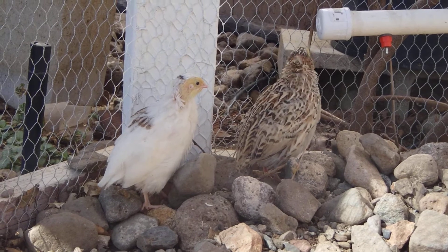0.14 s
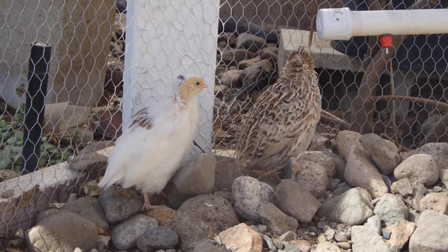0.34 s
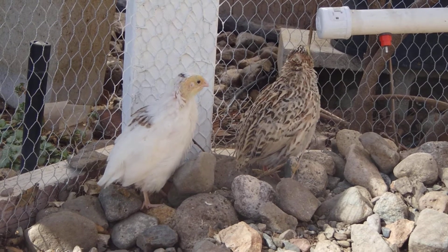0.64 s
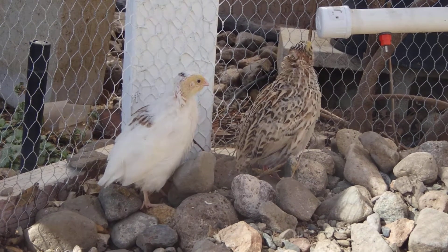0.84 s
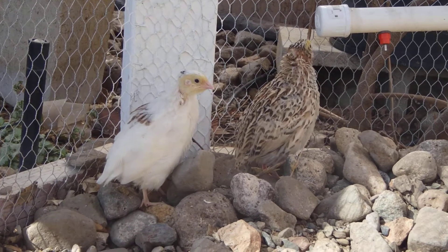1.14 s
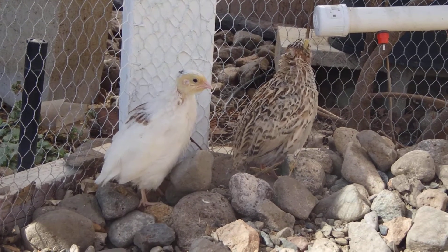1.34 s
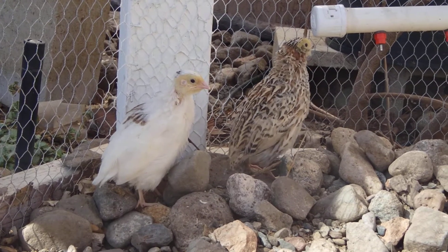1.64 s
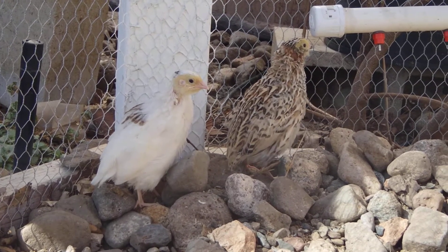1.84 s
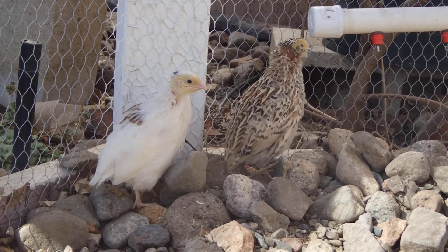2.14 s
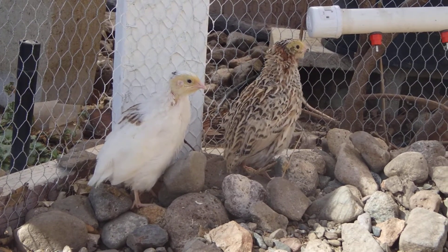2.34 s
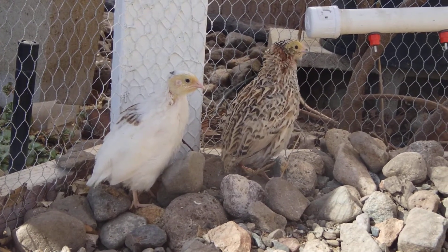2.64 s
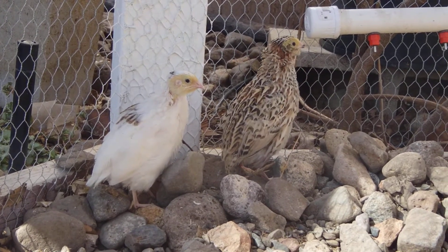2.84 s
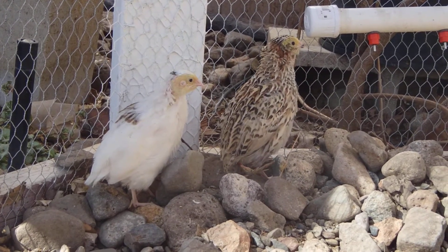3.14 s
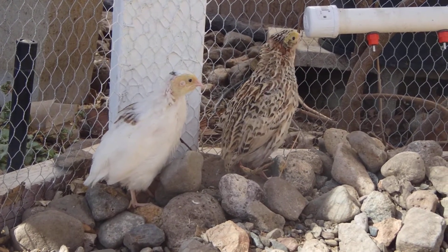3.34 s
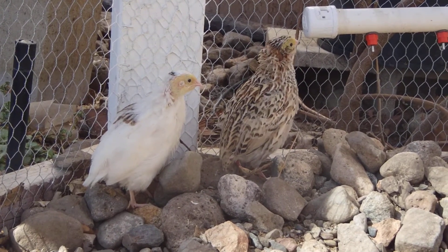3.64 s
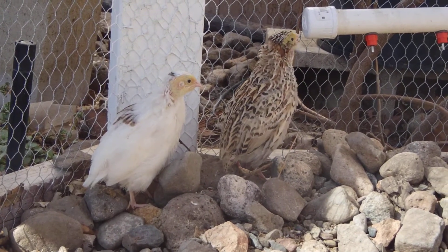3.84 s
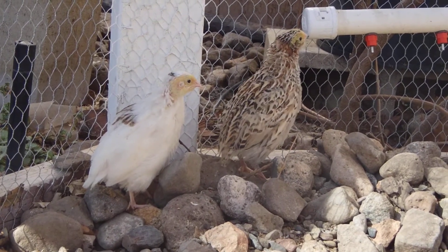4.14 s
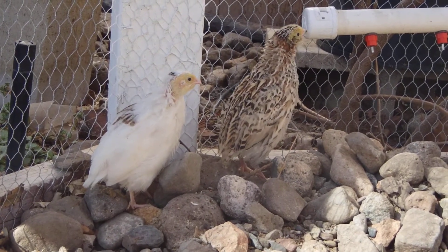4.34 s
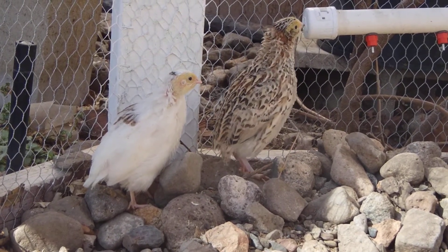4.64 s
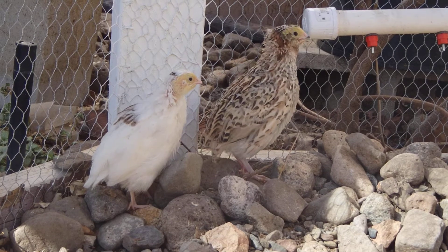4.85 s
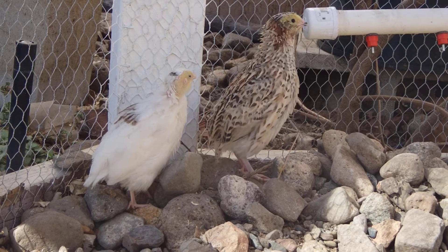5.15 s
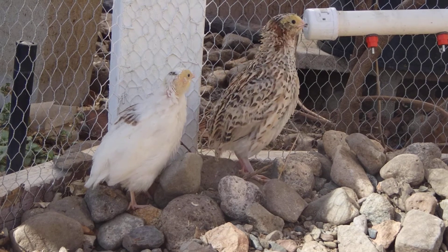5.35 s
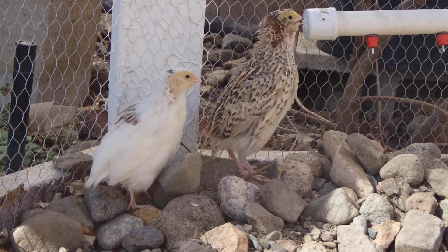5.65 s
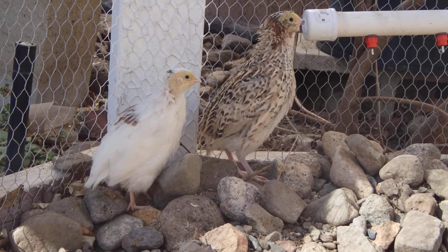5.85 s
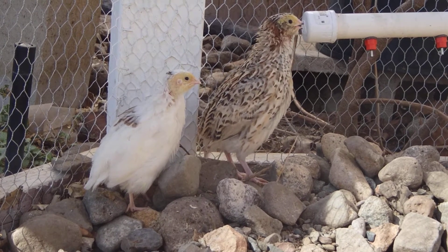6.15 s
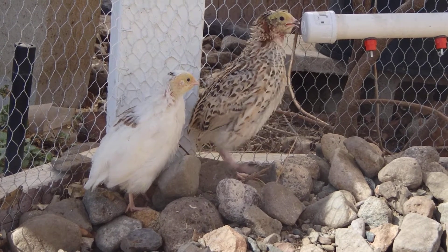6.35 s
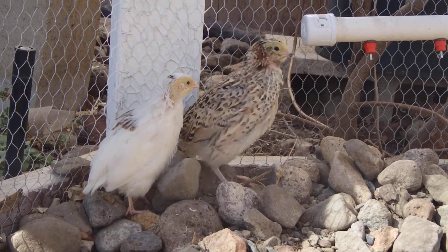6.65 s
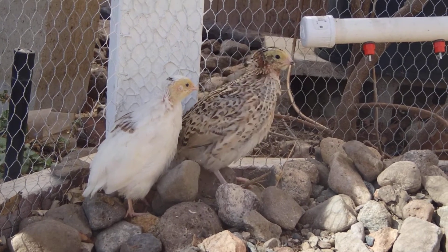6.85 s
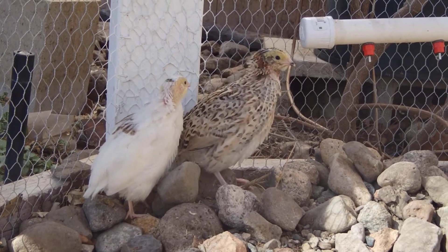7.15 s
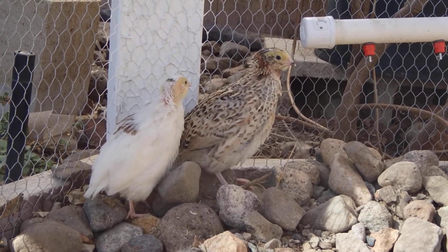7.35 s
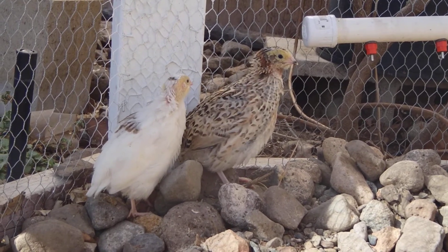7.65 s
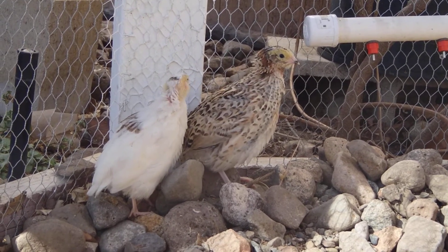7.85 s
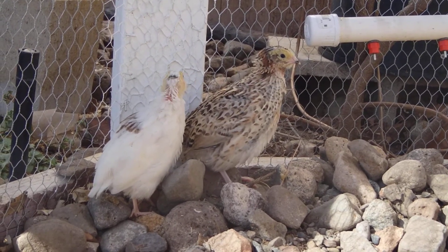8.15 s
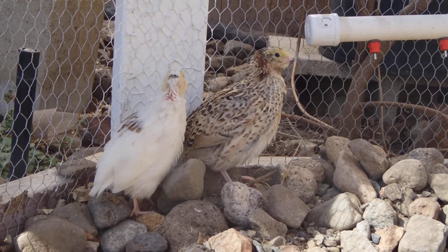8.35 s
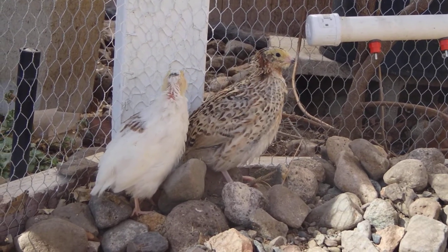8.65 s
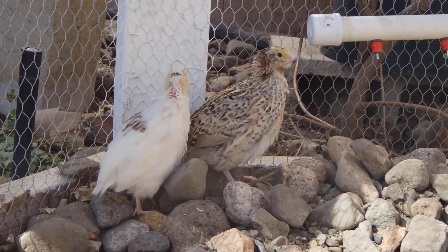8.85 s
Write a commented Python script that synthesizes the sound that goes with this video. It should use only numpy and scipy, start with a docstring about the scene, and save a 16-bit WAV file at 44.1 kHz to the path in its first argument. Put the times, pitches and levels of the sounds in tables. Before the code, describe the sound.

A faint outdoor rumble and hiss carry scattered chirps from birds across a yard. Nearby, a penned quail whimpers once, with a little scuffing and cracking of grit, then mutters hoarsely four times. It works up to six evenly spaced, sharp crows, each a wavering whistle that drops at the end, the strongest distorting a little. Distant chirps and two dull bumps remain afterward.

```python
"""A quail in a wire pen, close to the microphone, gives a faint whimper, four hoarse mutters, then six
crows that grow into loud, quavering, falling whistles. Its syrinx sounds a gliding tone and its throat
lifts the octave. Posts and walls throw the calls back, and the loudest overload the microphone.
Grit cracks underfoot among a few scuffs and soft bumps; birds chirp far off across the yard,
over a low outdoor rumble and hiss."""
import sys
import numpy as np
from scipy import signal
from scipy.fft import rfft, irfft
from scipy.io import wavfile
from scipy.ndimage import uniform_filter1d

SR = 44100
rng = np.random.default_rng(int(sys.argv[2]) if len(sys.argv) > 2 else 0)


def store_wav(level_fs):
    """Save 16-bit WAV to argv[1]."""
    pcm = np.round(np.clip(np.atleast_2d(level_fs), -1, 1) * 32767)
    wavfile.write(sys.argv[1], SR, pcm.T.astype(np.int16))


N = 396459

BREAK_S, CATCH_WIDTH_S = .002, .006  # how fast the voice changes register, and how briefly it catches

# Soft mutters, close by. Each row: start and length in seconds, settled pitch in Hz, slide time and hitch
# time in seconds, hitch lift in Hz; levels in dB, before the throat, of the fundamental and of the octave
# in the yelp, once settled and in the ending; hoarseness (0 is clear) once settled and in the ending.
QUAIL_MUTTERS = [(0.898, .21, 1375, 0.0095, 0.092, 40, -49.5, -43.5, -46, -46, 0.75, 1.04),
                 (1.509, .18, 1243, .018, .051, 100, -47.5, -40.5, -51, -44.5, 0.4, 0.97),
                 (2.266, 0.18, 1231, .019, 0.047, 149, -46, -38.5, -48.5, -42, 0.34, 0.94),
                 (2.825, 0.2, 1187, .018, 0.032, 269, -44, -37, -35, -38, .12, 0.27)]
# Full crows from the same spot. Each row: start and length in seconds, pitch at the catch in Hz, sag in
# Hz per second, crest length in seconds, crest lift in Hz; loudest from, loudest until and catch time in
# seconds; catch depth in dB; levels in dB, before the throat, of the fundamental, the side tone and the
# octave at the opening, at its loudest, before the catch and in the tail; beak gain on overtones in dB.
QUAIL_CROWS = [(3.354, 0.21, 1242, 60, 0.014, 38, .095, 0.12, 0.15, 17, -33.5, -33.5, -34, -15.5, -26, -21.5, -9),
               (3.915, 0.22, 1271, 200.4, 0.024, 216, 0.076, 0.091, 0.15, 12, -29, -31.5, -25, -12, -25.5, -15, -9),
               (4.465, 0.23, 1261, 261, 0.036, 300, 0.071, 0.081, .166, 18.5, -25.5, -24, -19, -2.5, -18.5, -12.5, -5),
               (5.036, 0.23, 1252, 620, 0.036, 320, 0.062, 0.12, 0.17, 0, -25, -26.5, -12, -3.5, -12, -12, 0),
               (5.655, 0.22, 1249, 476, .02, 130, 0.095, 0.11, .166, 17, -23.5, -31.5, -10.5, -3.5, -14, -8, 1),
               (6.333, 0.23, 1239, 331, .015, 20, 0.051, 0.073, 0.16, 6.5, -26, -31.5, -13, -8.5, -17.5, -12.5, 1.5)]

def quail(whimper_at_s=.35):
    """The bird in the pen works up from a whimper through mutters to full crows."""
    out = np.zeros(N)
    add(out, whimper_at_s, whimper())
    for start, *row in QUAIL_MUTTERS:
        add(out, start, mutter(*row))
    for start, *row in QUAIL_CROWS:
        add(out, start, crow(*row))
    return out


def crow(length, pitch_hz, sag, crest_s, crest_hz, loudest_s, until_s, catch_s, catch_db,
         low_db, side_db, open_db, top_db, late_db, tail_db, beak_db,
         pip_hz=2005, pip_s=.0135, quaver_at_s=.0195, quaver_s=.037, quaver_hz=245,
         sag_from_s=.085, fall_hz_per_s=2400, weak_db=-28.5, side_hz=1693):
    """A pip breaks into a quaver that swells to a crest; the whistle holds, catches and falls away."""
    t = np.arange(0, length, 1 / SR)
    pip = 1 - step(t, pip_s, BREAK_S)
    quaver = np.sin(2 * np.pi * np.clip((t - quaver_at_s) / quaver_s, 0, 1)) ** 2  # two upward swings
    crest_at = quaver_at_s + quaver_s
    lift_hz = crest_hz * np.sin(np.pi * np.clip((t - crest_at) / crest_s, 0, 1) ** .75)
    crest = lift_hz / quaver_hz
    opening = 1 - step(t, crest_at + .68 * crest_s, CATCH_WIDTH_S)
    catch, tail = hump(t, catch_s, CATCH_WIDTH_S), step(t, catch_s, CATCH_WIDTH_S)

    hz = pitch_hz + sag * (catch_s - np.clip(t, sag_from_s, catch_s))
    hz -= fall_hz_per_s * np.maximum(t - catch_s - .006, 0)
    hz += quaver_hz * quaver + lift_hz + 40 * catch
    hz += pip * (pip_hz - hz)

    swell_db = np.interp(t, [pip_s, loudest_s, until_s, catch_s], [open_db, top_db, top_db, late_db])
    swell_db += tail * (tail_db - swell_db) - catch_db * catch
    octave_db = swell_db + pip * (-42 - swell_db)  # the pip has little octave
    fundamental_db = low_db + .22 * (swell_db - top_db) * (1 - pip)  # follows part of the swell
    fundamental_db += 2 * crest - 1.5 * pip - 4 * tail
    overtones_db = beak_db - 12 * opening - 9 * catch  # duller in the quaver and the catch
    waver_db = 1.25 * flutter(len(t), width_hz=25).real
    fade_db = 18.5 * edges(t, attack_s=.0069, release_s=.014) + waver_db

    weak = step(-swell_db, -weak_db, 4) * (t < loudest_s)  # hoarse until the octave gains strength
    rough = .02 + .068 * opening + .3 * weak
    # a rough side tone sounds at the top of each swing
    side_tone = (np.exp(2j * np.pi * side_hz * t) * flutter(len(t), width_hz=49)).real
    side_tone *= gain_of(side_db) * (quaver + crest)
    return side_tone + voice(hz, fundamental_db - fade_db, octave_db - fade_db, rough, overtones_db)


def mutter(length, pitch_hz, slide_s, hitch_s, hitch_hz, low_db, yelp_db, settled_db, ending_db,
           settled_rough, ending_rough, squeak_hz=2160, catch_s=.138, throb_hz=34.6,
           droop_hz_per_s=900, yelp_rough=.34):
    """A squeak slides down in a throbbing yelp, settles, catches and ends hoarsely."""
    t = np.arange(0, length, 1 / SR)
    yelp = np.exp(-np.maximum(t - .023, 0) / .04)
    ending = step(t, catch_s, CATCH_WIDTH_S)
    hz = pitch_hz + (squeak_hz - pitch_hz) * np.exp(-t / slide_s) + hitch_hz * hump(t, hitch_s, .008)
    hz += ending * (90 * ending_rough - droop_hz_per_s * (t - catch_s))  # a hoarse ending starts higher

    throb_db = 6 * np.cos(2 * np.pi * throb_hz * (t - .022)) * np.exp(-t / .13) * (1 - ending)
    octave_db = settled_db + throb_db + yelp * (yelp_db - settled_db) + ending * (ending_db - settled_db)
    octave_db -= 11 * (1 - step(t, .01, BREAK_S))  # held back until the squeak breaks
    squeak = hump(t, at=.01, width=.0054)
    fundamental_db = low_db + 10 * squeak - 2 * ending
    fade_db = 11 * edges(t, attack_s=.009, release_s=.026) + 10 * hump(t, catch_s, CATCH_WIDTH_S)
    rough = settled_rough + yelp * (yelp_rough - settled_rough) + ending * (ending_rough - settled_rough)
    return voice(hz, fundamental_db - fade_db, octave_db - fade_db, rough, beak_db=-11, rasp_hz=330)


def whimper(length_s=.13, from_hz=1460, to_hz=1340):
    """One weak falling note, faint even this close."""
    t = np.arange(0, length_s, 1 / SR)
    hz = np.linspace(from_hz, to_hz, len(t))
    fade_db = 6 * edges(t, attack_s=.018, release_s=.072)
    return voice(hz, low_db=-48.5 - fade_db, octave_db=-63 - fade_db, rough=.24, beak_db=-8)


# The throat's colour on fundamental and octave; the octave crosses its upper edge as a crow crests.
# Each row: frequency in Hz, gain in dB.
THROAT_COLOUR = [(1080, -7.5), (1180, -1), (1720, -1), (1980, -2), (2230, -1.5), (3050, 1.5), (3180, -8),
                 (3320, -22), (3600, -13), (4200, -12)]
# Partials 3 to 6. Each row: frequency in Hz, level against the fundamental in dB.
OVERTONE_COLOUR = [(3350, -12), (3800, -16), (4200, -14.5), (4450, -15.5), (4650, -13), (5100, -21.5),
                   (5450, -28.5), (6300, -44), (8000, -46)]

def voice(hz, low_db, octave_db, rough, beak_db, rasp_hz=260, easy_hz=1310, strain_db_per_hz=.2):
    """The syrinx sounds a gliding tone; the throat colours its fundamental and its strong octave."""
    size = len(hz)
    # a hoarse voice holds its pitch and strength less steadily
    hz = hz * (1 + (.0064 + .04 * rough) * flutter(size, width_hz=70).real)
    strength = gain_of(6 * np.minimum(rough, .5) * flutter(size, width_hz=45).real)
    phase = 2 * np.pi * np.cumsum(hz) / SR
    partials = [(1, low_db + read(THROAT_COLOUR, hz), rough),
                (2, octave_db + read(THROAT_COLOUR, 2 * hz), rough)]
    # the overtones thin out when the pitch is strained upward
    upper_db = low_db + beak_db - strain_db_per_hz * np.clip(hz - easy_hz, 0, 400)
    partials += [(k, upper_db + read(OVERTONE_COLOUR, k * hz), rough + .23) for k in range(3, 7)]
    tone = 0
    for k, db, hoarseness in partials:
        smear = np.clip(.94 * hoarseness, 0, 1)  # turbulence smears the partial into a band
        rasp = np.sqrt(1 - smear ** 2) + smear * flutter(size, rasp_hz)
        tone += gain_of(db) * np.exp(1j * k * phase) * rasp
    return np.sqrt(2) * strength * tone.real * signal.windows.tukey(size, .04)


# Stones, post and walls around the pen. Each row: delay in seconds, level in dB, side (-1 left, 1 right).
PEN_REFLECTIONS = [(.0031, -13.5, 0.55), (.0082, -15, -0.32), (0.0145, -10.5, 0.53), (0.0227, -25, -0.8),
                   (0.038, -24, 0)]

def pen(calls, direct_s=.0014, bird_side=-.17, port_lag_s=.000092):
    """Direct sound and reflections reach the microphone's two ports, each with its own colour."""
    hz = np.fft.rfftfreq(N, 1 / SR)
    ports = np.array([[.5], [-.5]])
    paths = sum(gain_of(db) * np.exp(-2j * np.pi * hz * (delay + ports * side * port_lag_s))
                for delay, db, side in [(direct_s, 0, bird_side)] + PEN_REFLECTIONS)
    balance_db = read([(700, -.5), (1300, 1), (2400, 1.3), (3000, -3.5), (4400, 11.5), (8000, 0)], hz)
    return irfft(rfft(calls) * paths * gain_of(ports * balance_db), N)


# Grit cracking under a foot. Each row: start in seconds, level in dB.
GRIT_CRACKS = [(0.6346, -28), (0.6436, -26), (0.653, -24), (0.6582, -20), (.675, -24), (0.847, -41)]
# Soft scuffs. Each row: start in seconds, length in seconds, level in dB.
FOOT_SCUFFS = [(0.623, 0.076, -41.5), (0.953, 0.15, -45.5), (6.124, 0.065, -39.5)]
# The colours of grit and of scuffing. Each row: frequency in Hz, relative level in dB.
GRIT_COLOUR = [(300, -14), (1000, -11.5), (2100, -5), (3000, 2), (4000, -4), (4800, 7), (5500, -2),
               (7000, 1.5), (8500, -20), (15000, -30)]
SCUFF_COLOUR = [(500, -25), (1400, -2.5), (2700, 2), (3600, -13), (4500, -5), (6000, -21), (14000, -27)]

def feet(crack_s=.0017, left_db=-3):
    """A little right of centre, grit snaps in tiny bursts; feet and feathers scuff."""
    cracks, scuffs = np.zeros((2, 2, N))
    t = np.arange(SR // 100) / SR
    for start, db in GRIT_CRACKS:
        burst = rng.standard_normal(len(t)) + .64 * rng.standard_normal((2, len(t)))
        add(cracks, start, gain_of(db) * burst * np.exp(-t / crack_s))
    for start, length, db in FOOT_SCUFFS:
        size = int(length * SR)
        rub = rng.standard_normal(size) + .5 * rng.standard_normal((2, size))
        add(scuffs, start, gain_of(db) * rub * np.hanning(size))
    return (coloured(cracks, GRIT_COLOUR) + coloured(scuffs, SCUFF_COLOUR)) * gain_of([[left_db], [0]])


# Soft bumps, dead centre. Each row: start in seconds, pitch in Hz, level in dB, decay in seconds.
SOFT_BUMPS = [(.672, 85, -31.5, 0.006), (0.7449, 128, -24.5, 0.0032), (.745, 290, -37, .004),
              (7.326, 97, -35, 0.012), (7.594, 78.6, -25.5, 0.0058)]

def bumps():
    """Dull knocks that swing for a cycle or two."""
    out, t = np.zeros(N), np.arange(SR // 5) / SR
    for start, hz, db, decay in SOFT_BUMPS:
        envelope = t / decay * np.exp(1 - t / decay)
        add(out, start, -gain_of(db) * np.sin(2 * np.pi * hz * t) * envelope)
    return out


# Birds far from the microphone. Each row: start and length in seconds, first and last pitch in Hz,
# level in dB before the mix, harshness as band width in Hz.
FAR_CHIRPS = [(0.059, 0.14, 2970, 3100, -53.5, 220), (.5, .3, 2070, 2130, -58, 50),
              (.555, 0.059, 2980, 3190, -47.5, 200), (1.095, 0.065, 3930, 4140, -55, 100),
              (1.814, 0.066, 2757, 3600, -41.5, 333), (1.951, 0.15, 3000, 2810, -53, 300),
              (2.545, 0.056, 2800, 2970, -50, 250), (4.259, 0.068, 2435, 3330, -38.5, 200),
              (4.977, .025, 3010, 3190, -46, 298), (5.516, 0.1, 2880, 3050, -46.5, 197),
              (6.80, 0.055, 2100, 2640, -53.5, 120), (6.923, 0.062, 2770, 3290, -39, 300),
              (6.985, 0.087, 3070, 3030, -44.5, 220), (7.11, 0.025, 3000, 3050, -47.5, 200),
              (7.187, 0.051, 3110, 3190, -48, 200), (7.60, 0.12, 2030, 2330, -54, 25),
              (7.621, 0.11, 2980, 3050, -54, 150), (7.632, 0.094, 4120, 4600, -57.5, 320),
              (7.892, 0.056, 3870, 4400, -56, 260), (7.915, 0.061, 2330, 3000, -45.5, 80),
              (8.50, 0.056, 2000, 2300, -59, 70), (8.804, 0.13, 2990, 3170, -51, 199)]

def far_birds():
    """Short slurs, some clear and some harsh."""
    out = np.zeros(N)
    for start, length, from_hz, to_hz, db, width_hz in FAR_CHIRPS:
        size = int(length * SR)
        phase = 2 * np.pi * np.cumsum(np.linspace(from_hz, to_hz, size)) / SR
        tone = (np.exp(1j * phase) * flutter(size, width_hz)).real
        add(out, start, gain_of(db) * np.sqrt(2) * tone * signal.windows.tukey(size, .6))
    return out


# The yard's reverberation. Each row: frequency in Hz, time to fall 60 dB in seconds.
YARD_DECAY = [(1000, 0.31), (2500, 0.42), (5000, 0.54), (12000, 0.19)]

def yard(sound, apart=.33, build_s=.023):
    """A diffuse tail, partly shared by the two ports, each band dying at its own speed."""
    taps = rng.standard_normal(SR) + apart * rng.standard_normal((2, SR))
    taps *= np.clip(np.arange(SR) / SR / build_s, 0, 1)
    hz, t, bands = signal.stft(taps, SR, nperseg=256)
    decay = gain_of(-60 * t / read(YARD_DECAY, hz)[:, None])
    tail = signal.istft(bands * decay, SR, nperseg=256)[1]
    return signal.fftconvolve(sound[None], tail / np.linalg.norm(tail[0]), axes=1)[:, :N]


# Outdoor air and microphone hiss. Each row: frequency in Hz, relative level in dB.
AIR_COLOUR = [(22, -12), (50, -4), (115, -1), (200, -12), (300, -17), (450, -21.5), (850, -22), (1500, -27),
              (2400, -26), (3150, -22), (3700, -30.5), (8000, -32.5), (14300, -31), (15600, -33.5)]
# How alike the air is at the two ports. Each row: frequency in Hz, left-right correlation.
AIR_CORRELATION = [(60, 0.94), (130, 0.99), (300, 0.82), (800, 0.79), (1500, 0.79), (3100, 0.36),
                   (6000, 0.13), (15000, 0.017)]
# The slow swell of the low rumble. Each row: time in seconds, gain in dB.
RUMBLE_SWELL = [(0, 0.5), (1, 0), (2, -1.2), (3, 0.5), (4.5, -2), (6, 0.2), (6.8, -1.5), (7.4, 3.5),
                (8, 0.5), (9, -0.5)]

def air(level_db=-41, patchy_db=1.55, calm_hz=3500, rumble_hz=250, left_lead_s=.00004):
    """Rumble swells slowly and far rustle drifts in patches; the hiss above them is even."""
    t = np.arange(N // 512 + 5) * 512 / SR
    hz = np.fft.rfftfreq(2048, 1 / SR)
    noise = rng.standard_normal((5, len(t), len(hz)))
    shared, separate = noise[0] + 1j * noise[1], noise[2] + 1j * noise[3]
    patches = evened(uniform_filter1d(uniform_filter1d(noise[4], size=14, axis=0), size=20, axis=1))
    rustle_db = patchy_db * patches / (1 + (hz / calm_hz) ** 4)
    swell_db = np.interp(t, *np.transpose(RUMBLE_SWELL))[:, None] / (1 + (hz / rumble_hz) ** 2)
    alike = read(AIR_CORRELATION, hz)
    left = shared * np.exp(2j * np.pi * hz * left_lead_s)
    right = alike * shared + np.sqrt(1 - alike ** 2) * separate
    bands = np.array([left, right]) * gain_of(read(AIR_COLOUR, hz) + swell_db + rustle_db)
    ambience = signal.istft(bands.transpose(0, 2, 1), nperseg=2048, noverlap=1536)[1]
    return gain_of(level_db) * evened(ambience[:, :N])


def gain_of(db):
    """Decibels to a factor."""
    return 10 ** (np.asarray(db) / 20)


def evened(x):
    """Scales to an rms of one."""
    return x / np.sqrt(np.mean(abs(x) ** 2) + 1e-20)


def read(points, hz):
    """Reads a curve on a log-frequency axis."""
    f, value = np.transpose(points)
    return np.interp(np.log(hz + 1), np.log(f + 1), value)


def add(mix, start_s, sound):
    """Mixes a sound in at its start time."""
    part = mix[..., round(start_s * SR):][..., :sound.shape[-1]]
    part += sound[..., :part.shape[-1]]


def coloured(x, points):
    """Gives a sound a spectrum, keeping the power of white noise."""
    return irfft(rfft(x) * evened(gain_of(read(points, np.fft.rfftfreq(N, 1 / SR)))), N)


def flutter(size, width_hz):
    """Complex random wobble of rms one; times a tone it gives a fuzzy line."""
    noise = rng.standard_normal(size) + 1j * rng.standard_normal(size)
    band = np.exp(-.5 * (np.fft.fftfreq(size, 1 / SR) / width_hz) ** 2)
    return evened(np.fft.ifft(np.fft.fft(noise) * band))


def hump(t, at, width):
    """A smooth hump of height one."""
    return np.exp(-((t - at) / width) ** 2)


def step(t, at, width):
    """A smooth change from zero to one."""
    return .5 + .5 * np.tanh((t - at) / width)


def edges(t, attack_s, release_s):
    """One at the very ends of a note, zero while it is held."""
    return np.maximum(1 - t / attack_s, 0) + np.maximum(1 - (t[-1] - t) / release_s, 0)


def scene(quail_wet_db=-25, far_wet_db=-8, far_direct_db=-1):
    """From beside the pen the quail is almost dry; the far birds carry much more of the yard."""
    near, far = quail(), far_birds()
    tail = yard(gain_of(quail_wet_db) * near + gain_of(far_wet_db) * far)
    return pen(near) + gain_of(far_direct_db) * far + tail + feet() + bumps() + air()


def record(dry, ceiling_db=.86, attack_s=.0004, recover_db_per_s=10, rail=.97, crackle=1.19,
           top_hz=15700, block=128):
    """The microphone's limiter ducks fast and recovers slowly; peaks over the rail clip and crackle."""
    peaks = np.maximum.reduceat(abs(dry).max(0), np.arange(0, N, block))
    over_db = np.maximum(20 * np.log10(np.repeat(peaks, block)[:N] + 1e-9) - ceiling_db, 0)
    recovery_db = np.arange(N) / SR * recover_db_per_s
    duck_db = np.maximum.accumulate(over_db + recovery_db) - recovery_db
    pole = np.exp(-1 / (attack_s * SR))
    limited = dry / gain_of(signal.lfilter([1 - pole], [1, -pole], duck_db))
    excess = limited - np.clip(limited, -rail, rail)
    # each overloaded crest breaks by a different amount
    breakup = crackle * uniform_filter1d(rng.standard_normal(N) ** 2, size=3)
    clipped = np.clip(limited - excess * breakup, -rail, rail)
    lowpass = signal.firwin(511, top_hz, window=("kaiser", 9), fs=SR)
    return signal.oaconvolve(clipped, lowpass[None], "same", axes=1)


dry = scene()
out = record(dry)
store_wav(out)
```